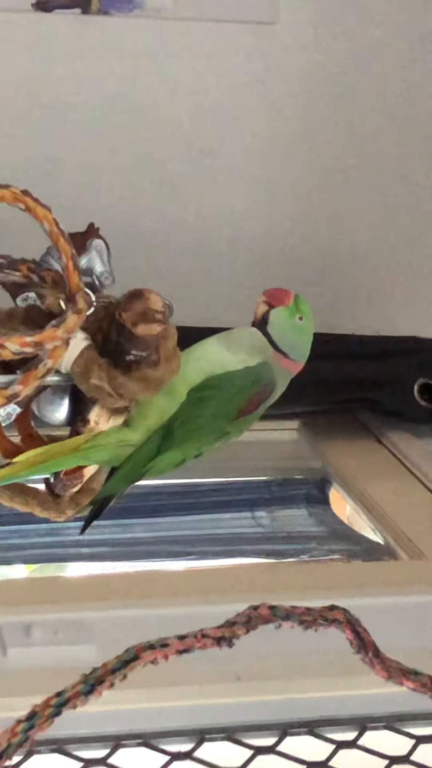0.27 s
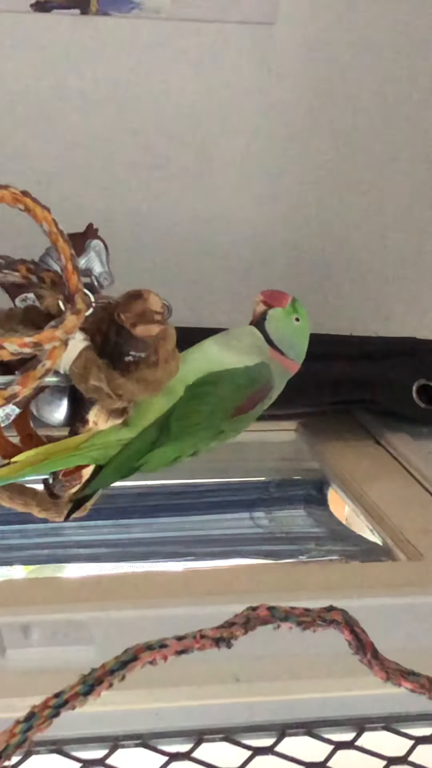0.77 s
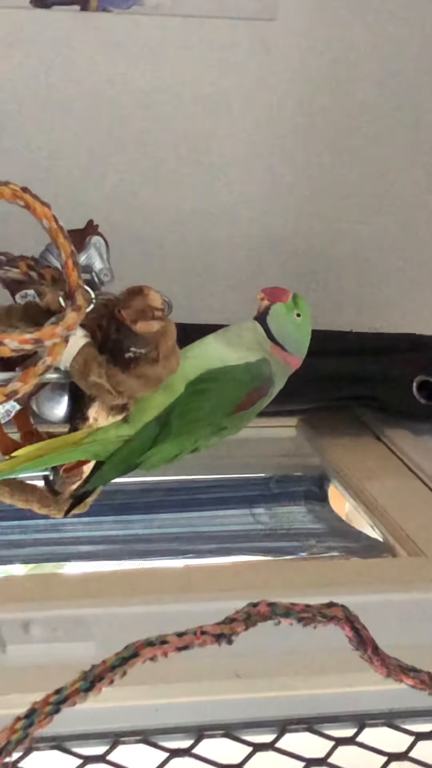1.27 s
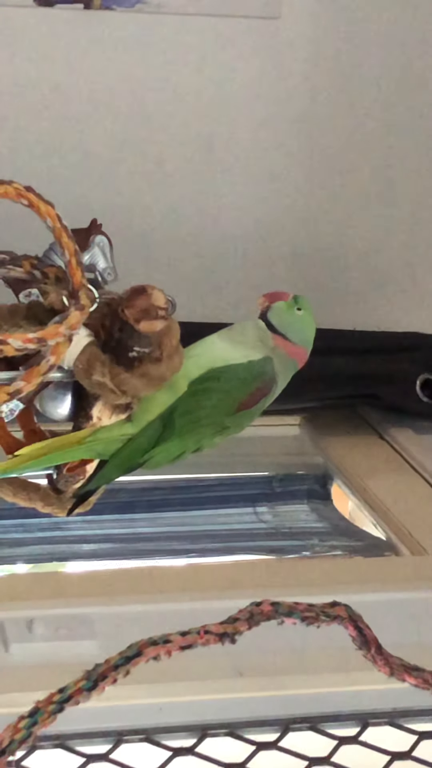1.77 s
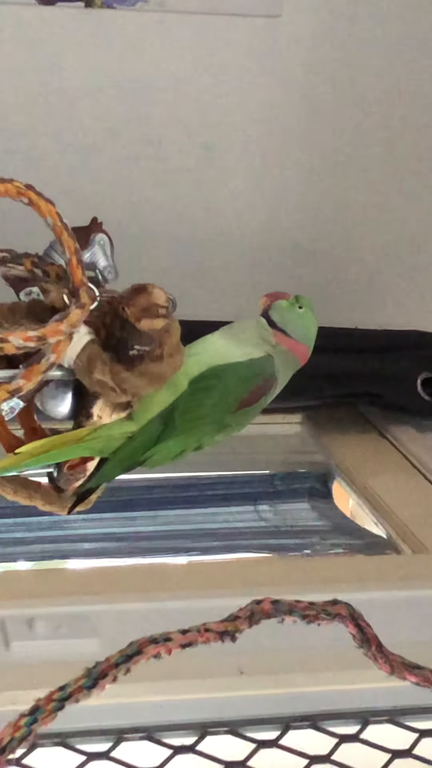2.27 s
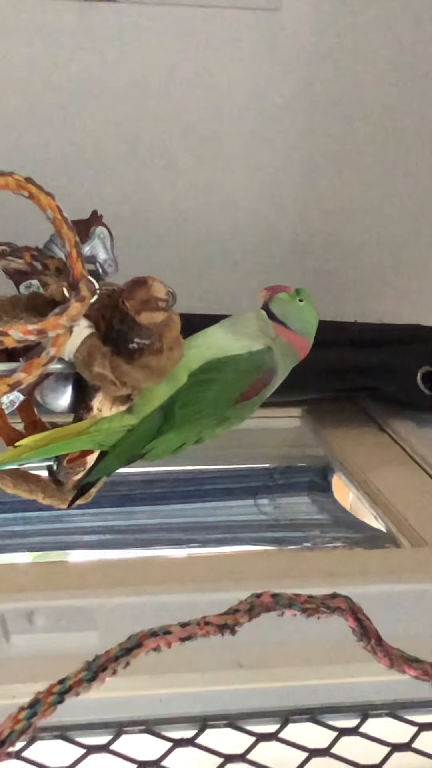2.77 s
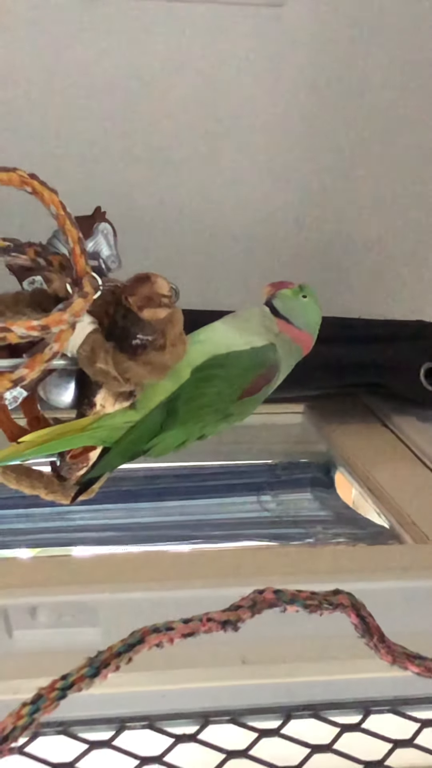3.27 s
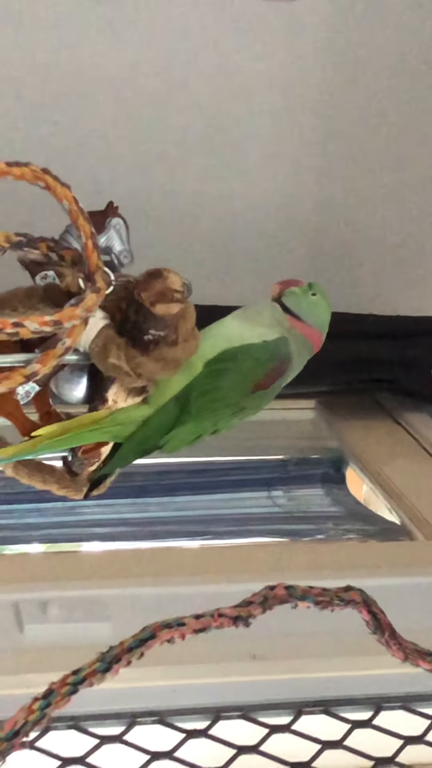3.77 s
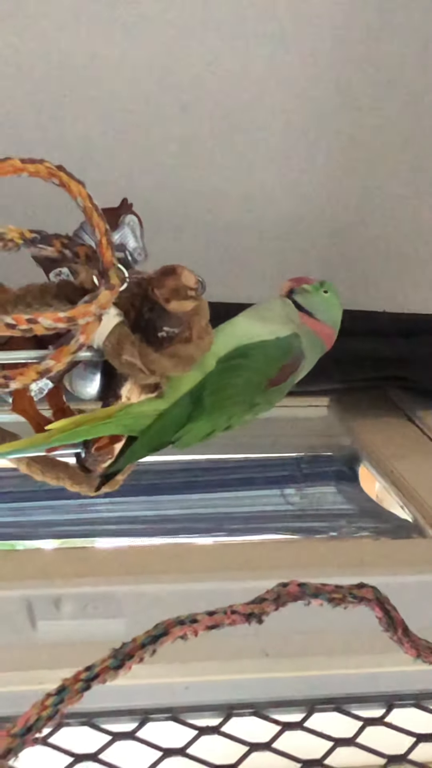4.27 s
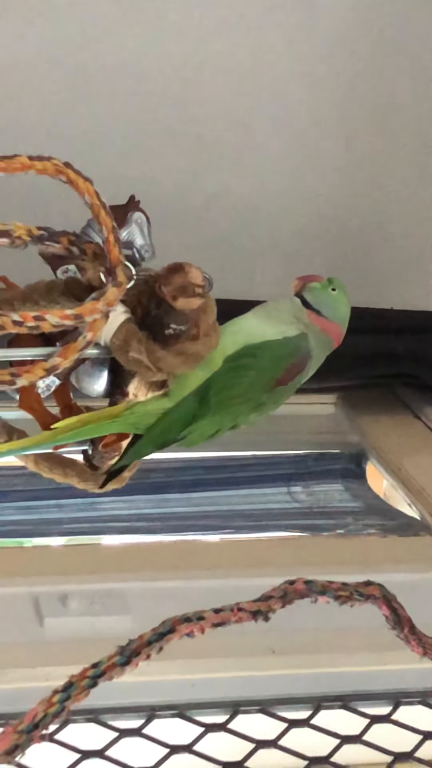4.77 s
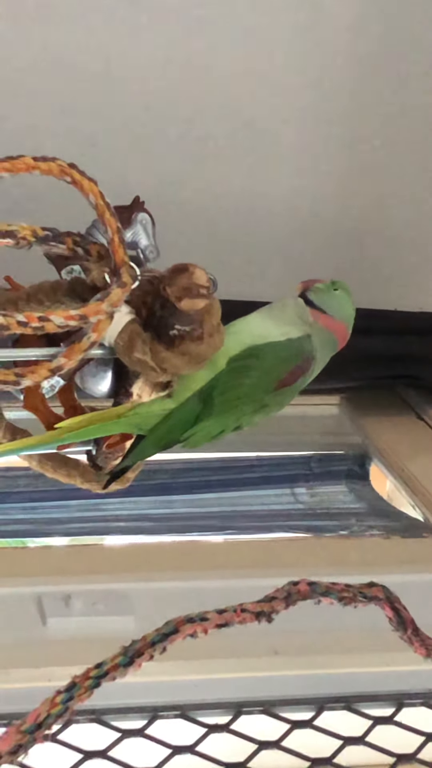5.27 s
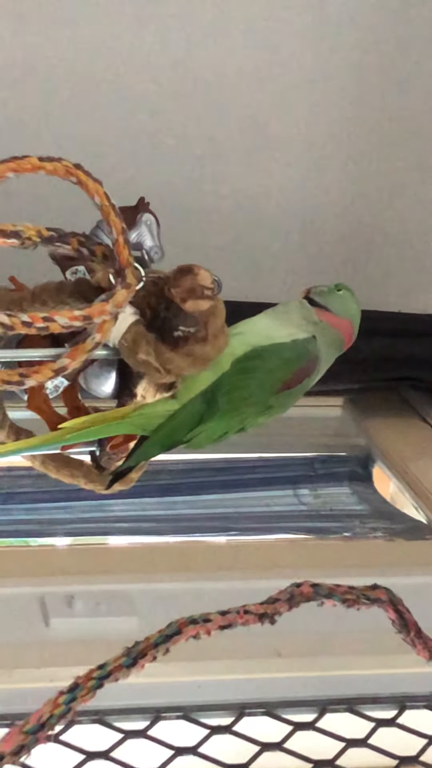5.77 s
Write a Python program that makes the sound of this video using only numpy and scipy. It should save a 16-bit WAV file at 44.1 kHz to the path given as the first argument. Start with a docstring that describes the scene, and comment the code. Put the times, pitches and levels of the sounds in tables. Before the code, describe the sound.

A large parakeet close to the microphone squawks twice in a small, quiet room. The first call is short, swooping up and then down into a bright, buzzing held note. After about three seconds comes a longer, harsher one, starting on a tiny whistle and breaking into a sinking rasp. Short room echoes follow each; faint low house rumble and hiss lie underneath.

```python
"""A large parakeet squawks twice in a small, quiet room.
Each squawk is a bright stack of harmonics that swoops, then holds with a deepening fast flutter.
The second starts on a thin whistle and breaks up into a long, sinking rasp.
The syrinx is a sum of swinging harmonics plus leaking air, coloured by the throat and beak.
Decaying noise makes the room's echoes; filtered noise makes the faint rumble and hiss of the house."""
import sys
import numpy as np
from scipy import signal
from scipy.fft import rfft, irfft, next_fast_len
from scipy.io import wavfile
from scipy.ndimage import uniform_filter1d

SR = 44100
rng = np.random.default_rng(int(sys.argv[2]) if len(sys.argv) > 2 else 0)


def dump(signal):
    """Clip the signal to [-1, 1] and save it as 16-bit WAV at the path in sys.argv[1]."""
    limited = np.clip(np.atleast_2d(signal).T, -1, 1)
    pcm = np.round(limited * 32767).astype(np.int16)
    wavfile.write(sys.argv[1], SR, pcm)


N = 265878
TIME = np.arange(N) / SR
CUTOFF_HZ = 15750

# the held note and the moves around it
HELD_HZ, ENTRY_GLIDE_S, SWOOP_S, RELEASE_S = 1650.3, .064, .011, .048
# the membranes swing unevenly at the onset and again when the swoop lands, then settle (share of the pitch)
ONSET_CHAOS, ONSET_SETTLE_S = 0.06446, .04
LANDING_CHAOS, LANDING_AFTER_S, LANDING_S = 0.02, 0.0452, 0.033
HELD_CHAOS = .004
# a slower second swing of the membranes puts side tones around each harmonic;
# it deepens while the note is held (share of the pitch per s)
FLUTTER_HZ, FLUTTER_PER_S = 366.6, .21
# the long squawk breaks into a rasp: the pitch jumps, holds and sinks, while the voice weakens and roughens
RASP_START_S, RASP_BREAK_S, RASP_HOLD_S = 4.04, .045, .085
RASP_JUMP_HZ, RASP_SINK_HZ_PER_S, RASP_FADE_DB_PER_S = 70.03, 2600, 11.5
RASP_CHAOS, RASP_CHAOS_PER_S = .064, .22
RASP_FLUTTER_LOSS = .3   # share of the regular flutter that the rasp breaks up
# the beak opens with the push, at the landing and in the rasp, lifting the upper harmonics
# (dB per octave for each dB of push, dB per octave, dB per octave)
BEAK_PER_DB, LANDING_LIFT_DB, RASP_LIFT_DB = 0.0808, 1.5, 1.43
# the mouth resonance
MOUTH_HZ, MOUTH_WIDTH_HZ, MOUTH_DB = 6666.7, 390, 1.5


def from_db(db):
    """Decibels to gain."""
    return 10 ** (np.asarray(db) / 20)


def rms_one(x):
    """Scale to unit power."""
    return x / np.sqrt(np.mean(x ** 2) + 1e-20)


def bell(x, centre, width):
    """A smooth hump of height 1 around centre, in time or in frequency."""
    return np.exp(-((x - centre) / width) ** 2)


def ramp(t, start_s, length_s):
    """Rise evenly from 0 to 1."""
    return np.clip((t - start_s) / length_s, 0, 1)


def in_time(rows, t):
    """Each column of a curve at the times t."""
    s, *columns = np.transpose(rows)
    return [np.interp(t, s, column) for column in columns]


def at_hz(points, hz):
    """Read a spectrum on a log-frequency axis."""
    known_hz, values = np.transpose(points)
    return np.interp(np.log(np.maximum(hz, 1)), np.log(known_hz), values)


def coloured(x, spectrum):
    """Pass a sound through a smooth response."""
    size = next_fast_len(2 * len(x))
    gain = from_db(at_hz(spectrum, np.fft.rfftfreq(size, 1 / SR)))
    return irfft(rfft(x, size) * gain, size)[:len(x)]


def wander(t, low_hz, top_hz):
    """Random motion at rates between low_hz and top_hz; spread 1."""
    sos = signal.butter(4, [low_hz, top_hz], "band", fs=SR, output="sos")
    # the filter settles for a second before the part that is kept
    return rms_one(signal.sosfilt(sos, rng.standard_normal(len(t) + SR))[SR:])


def squawk(row, notches):
    """One call: the syrinx sounds through the throat, as loud as the bird pushes."""
    # response of throat and beak: (frequency [Hz], level [dB])
    throat = [(500, -47), (800, -8.5), (1150, -13.5), (1650, -9), (2000, -13), (2350, -5), (2750, -5.5),
              (3300, 0), (3650, -2.5), (4100, -8), (4700, -5.5), (5500, -0.5), (6600, -10), (8200, -13.5),
              (9100, -23.5), (11500, -23), (15500, -25)]
    start, _, end, *_ = row
    sounding = (TIME >= start) & (TIME <= end)
    t = TIME[sounding]
    pitch, level_db, chaos, flutter, beak, mouth_db = gesture(t, *row)
    source = syrinx(t, pitch, chaos, flutter, beak, mouth_db)
    hz = np.linspace(20, SR / 2, 1000)
    tract_db = at_hz(throat, hz) + sum(db * bell(hz, centre, width) for centre, width, db in notches)
    voice = coloured(source, np.column_stack([hz, tract_db]))
    # level the voice, so the push sets the loudness whichever resonances the harmonics cross
    power = uniform_filter1d(voice ** 2, size=600)
    out = np.zeros(N)
    out[sounding] = from_db(level_db) * voice / np.sqrt(power + 1e-12)
    return out


def gesture(t, start, swoop, end, attack, db, fade, first_hz, next_hz, sag_hz, recovery, dip_db, rough, lift_db):
    """Pitch, push, unsteadiness and mouth shape through one squawk."""
    # the mouth resonance drops out for a moment: (time [s], half length [s], level change [dB])
    mouth_dips = [(.440, .018, -11), (3.848, .022, -46)]
    age = t - start
    held = np.maximum(t - swoop, 0)
    rasping = np.maximum(t - RASP_START_S, 0)
    rasp = ramp(t, RASP_START_S, RASP_BREAK_S)
    landing = bell(t, swoop + LANDING_AFTER_S, LANDING_S)
    # the entry swoops into the held note, which sinks once the rasp has set in
    entry = first_hz + (next_hz - first_hz) * np.sin(np.pi / 2 * ramp(t, start, ENTRY_GLIDE_S))
    note = HELD_HZ - sag_hz * bell(held, 0, recovery)
    note += RASP_JUMP_HZ * rasp - RASP_SINK_HZ_PER_S * np.maximum(rasping - RASP_HOLD_S, 0)
    swooped = (1 + np.tanh((t - swoop) / SWOOP_S)) / 2
    pitch = np.maximum(entry + (note - entry) * swooped, HELD_HZ / 10)
    # attack, slow fade, release
    gate = ramp(t, start, attack) * (1 - ramp(t, end - RELEASE_S, RELEASE_S)) ** 2
    push_db = 20 * np.log10(gate + 1e-4) - fade * age - RASP_FADE_DB_PER_S * rasping
    level_db = db + push_db - dip_db * landing
    onset_chaos = ONSET_CHAOS * bell(age, 0, ONSET_SETTLE_S)
    chaos = HELD_CHAOS + rough * np.maximum(onset_chaos, LANDING_CHAOS * landing)
    chaos += RASP_CHAOS * rasp + RASP_CHAOS_PER_S * rasping
    flutter = FLUTTER_PER_S * held * (1 - RASP_FLUTTER_LOSS * rasp)
    beak = lift_db + BEAK_PER_DB * push_db + LANDING_LIFT_DB * landing + RASP_LIFT_DB * rasp
    mouth_db = MOUTH_DB + sum(drop_db * bell(t, s, length) for s, length, drop_db in mouth_dips)
    return pitch, level_db, chaos, flutter, beak, mouth_db


def syrinx(t, pitch, chaos, flutter, beak, mouth_db, shimmer=1.4, throb=0.65, rush=.3, stagger=.25,
           widest_blur=6.0, reach=1.5):
    """Membranes swing at the pitch, shaken by a slower regular flutter and by chaos."""
    # strength of the lowest harmonics, held flat above the last: (multiple of the pitch, level [dB])
    harmonics = [(1, 2.5), (2, 3), (3, -2), (4, 1), (5, -1), (6, -2.5), (8, -5)]
    flutter_hz = FLUTTER_HZ * (1 + 0.02 * wander(t, low_hz=5, top_hz=50.6))
    beat = np.sin(2 * np.pi * np.cumsum(flutter_hz) / SR)
    # a chaotic swing staggers about its pitch and jitters from cycle to cycle, within a limited reach
    staggering = stagger * chaos * wander(t, low_hz=25, top_hz=79.137)
    phase = 2 * np.pi * np.cumsum(pitch * (1 + staggering)) / SR
    lurch = reach * np.tanh(wander(t, low_hz=92.13, top_hz=377))
    jitter = 2 * np.pi * np.cumsum(pitch * (flutter * beat + chaos * lurch)) / SR
    tone = np.zeros(len(t))
    for k in np.arange(1, CUTOFF_HZ // pitch.min() + 1):
        level_db = np.interp(k, *np.transpose(harmonics)) + beak * np.log2(k)
        level_db += mouth_db * bell(k * pitch, MOUTH_HZ, MOUTH_WIDTH_HZ)
        # fade each harmonic out before it reaches half the sample rate
        audible = np.clip((SR / 2 - k * pitch) / (SR / 2 - CUTOFF_HZ), 0, 1)
        # higher harmonics blur more, up to a limit, so gaps stay open between them
        blur = widest_blur * np.tanh(k / widest_blur)
        tone += from_db(level_db) * audible * np.sin(k * phase + blur * jitter)
    # uneven swings are also uneven in strength
    uneven = shimmer * chaos * wander(t, low_hz=60.62, top_hz=315.6)
    strength = np.exp(throb * flutter * beat + uneven)
    # when the swing is uneven, air leaks through once in each cycle
    air = rush * chaos * (1 + np.cos(phase + jitter)) * rng.standard_normal(len(t))
    return strength * (tone + air)


def swelling(x, band_hz=3450, width_hz=450):
    """The band of the strongest partial swells or dips briefly."""
    # (time [s], half length [s], level change [dB])
    swells = [(0.562, 0.0144, 7.5), (0.63, 0.0085, -8), (0.651, 0.0086, 8.5), (3.823, .007, 3),
              (3.858, .012, -5.5), (3.888, 0.01, 4), (3.943, .009, -15), (3.955, 0.0043, 9),
              (4.063, 0.0122, 5)]
    band = irfft(rfft(x) * bell(np.fft.rfftfreq(N, 1 / SR), band_hz, width_hz), N)
    swell_db = sum(db * bell(TIME, s, length) for s, length, db in swells)
    return x + band * (from_db(swell_db) - 1)


def whistle(overtone_step_db=-7.5, waver=0.0093, hiss_db=-34):
    """A thin high note, each overtone weaker than the last, with a little rushing air."""
    # the lead into the second squawk: (time [s], pitch [Hz], level [dB])
    glide = [(3.761, 2920, -46.5), (3.765, 2881, -26), (3.775, 2830, -21), (3.787, 2867, -15.5),
             (3.794, 2686, -15), (3.803, 2725, -41.5)]
    pitch, level_db = in_time(glide, TIME)
    wavering = waver * wander(TIME, low_hz=100, top_hz=690.5)
    phase = 2 * np.pi * np.cumsum(pitch * (1 + wavering)) / SR
    tone = sum(from_db(overtone_step_db * k) * np.sin((k + 1) * phase) for k in range(5))
    # differenced noise leans to the treble
    air = from_db(hiss_db) * rms_one(np.diff(rng.standard_normal(N + 1)))
    sounding = (TIME >= glide[0][0]) & (TIME <= glide[-1][0])
    return from_db(level_db) * (rms_one(tone) + air) * sounding


def room(x, wet_db=-3.0, first_echo_s=0.001774, build_s=0.0071):
    """Dense wall echoes build up and die away, the high treble fastest."""
    # the room's ring: (frequency [Hz], time to fall 60 dB [s])
    ring = [(800, 0.44), (1600, 0.47), (3300, 0.421), (5000, 0.35), (8000, .36), (11000, .3), (16000, 0.25)]
    t = TIME[:SR]
    hz, frame_s, bands = signal.stft(rng.standard_normal(len(t)), SR, nperseg=256)
    dying = from_db(-60 * frame_s / at_hz(ring, hz)[:, None])
    echoes = signal.istft(bands * dying, SR)[1][:len(t)]
    echoes *= ramp(t, first_echo_s, build_s)
    return from_db(wet_db) * signal.fftconvolve(x, echoes / np.linalg.norm(echoes))[:N]


def house(level_db=-59, low_cut_hz=38):
    """Faint, steady rumble and hiss of the house: shaped noise without the deepest bass."""
    # (frequency [Hz], relative level [dB per Hz])
    noise_spectrum = [(15, -36.5), (25, -7), (49, -0.5), (82, -4), (133, -0.5), (233, -5), (274, -4),
                      (340, -6.5), (410, -7.5), (509, -11), (762, -14.5), (826, -15), (1570, -23),
                      (5010, -35), (15500, -40)]
    noise = coloured(rng.standard_normal(N), noise_spectrum)
    low_cut = signal.butter(6, low_cut_hz, "high", fs=SR, output="sos")
    return from_db(level_db) * rms_one(signal.sosfilt(low_cut, noise))


def scene():
    """The bird close by, its echoes and the background."""
    # the first squawk glides up, the second starts high;
    # each swoops down below its held note and creeps back to it:
    # (start [s], swoop [s], end [s], attack [s], level [dB], fade [dB per s], first pitch [Hz],
    #  pitch the entry glides towards [Hz], sag [Hz], recovery [s], dip after the swoop [dB],
    #  roughness [0-1], lift of the upper harmonics [dB per octave])
    squawks = [(.371, .468, 0.7124, 0.042, -14, 6, 950.4, 2320, 216.2, .085, 6.5, .95, 2.5),
               (3.795, 3.808, 4.5212, .005, -13.5, 19.5, 2113, 2094, 84.85, .115, 2, 0.3, 1.6048)]
    # antiresonances of the windpipe, one list per squawk: (frequency [Hz], width [Hz], level [dB])
    windpipe = [
        [(1260, 52, -2), (2600, 140, -6), (5252.6, 140, -13.5), (7440, 180, -11.5), (10328, 270, -8.5)],
        [(2260, 86, -0.5), (4059, 120, -5.5), (5487, 780, -2.5), (7500, 180, -1), (10440, 250, -0.5)],
    ]
    calls = sum(squawk(row, notches) for row, notches in zip(squawks, windpipe))
    bird = whistle() + swelling(calls)
    return (bird + room(bird) + house())[None]


def record(dry):
    """The top is cut steeply."""
    top_cut = signal.ellip(12, .1, 90, CUTOFF_HZ, fs=SR, output="sos")
    return signal.sosfilt(top_cut, dry)


dry = scene()
out = record(dry)
dump(out)
```